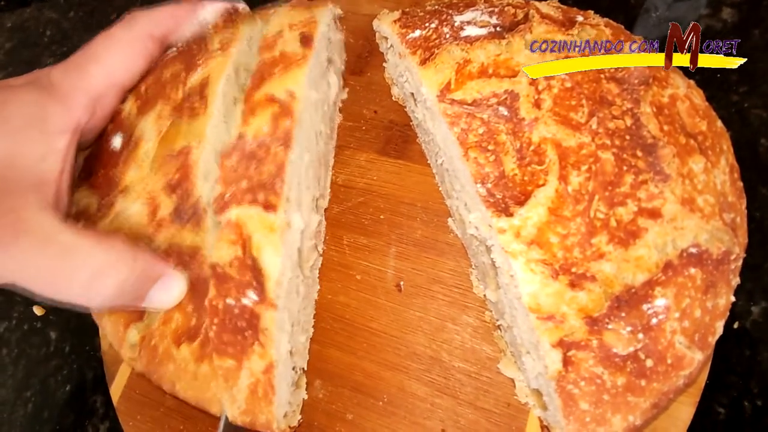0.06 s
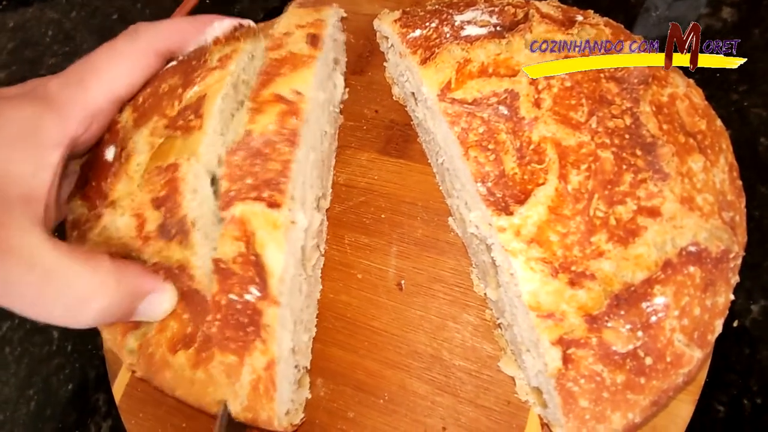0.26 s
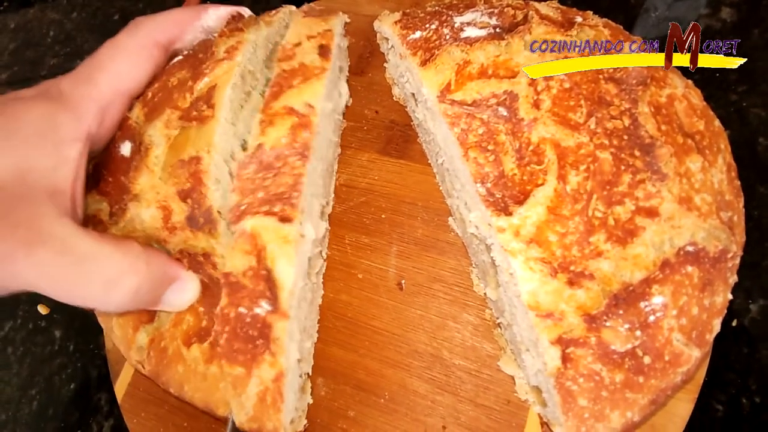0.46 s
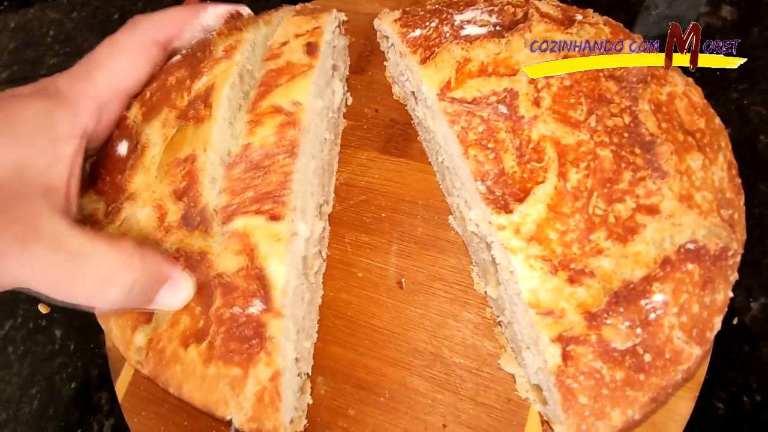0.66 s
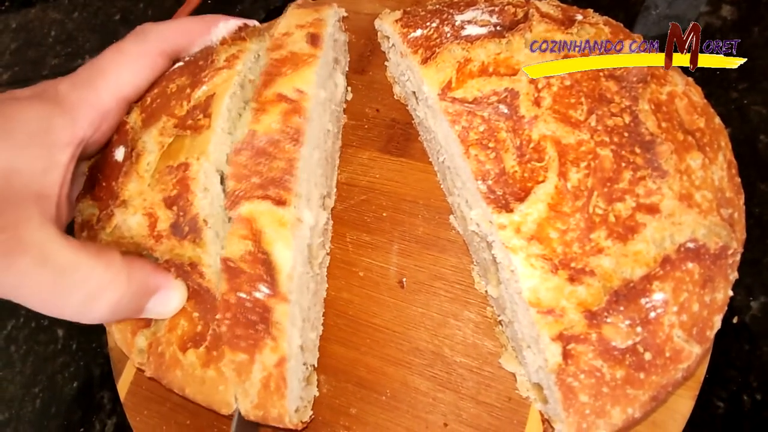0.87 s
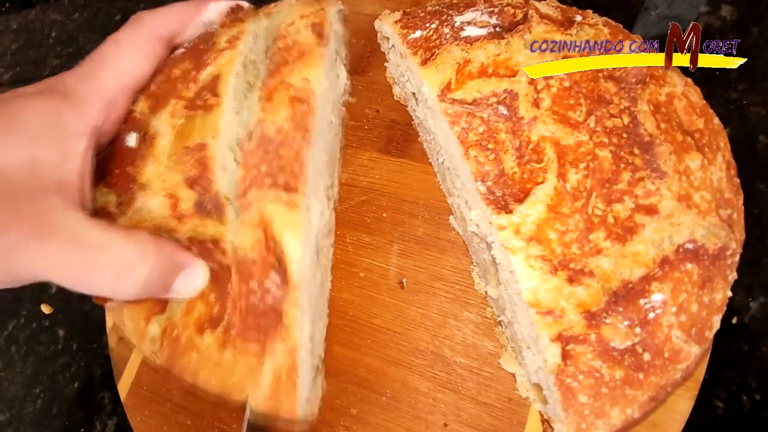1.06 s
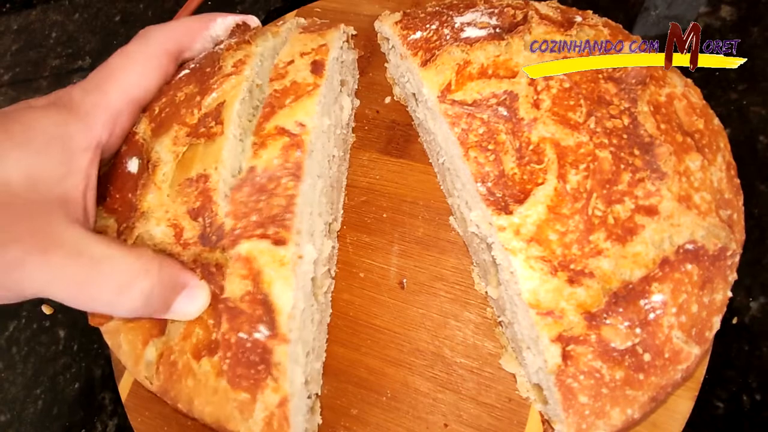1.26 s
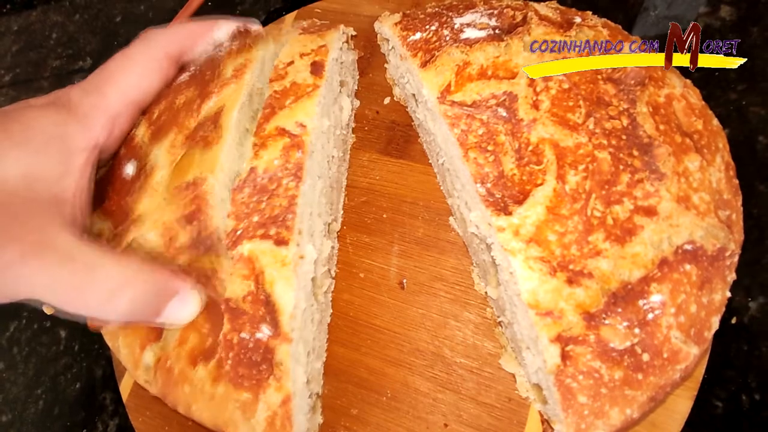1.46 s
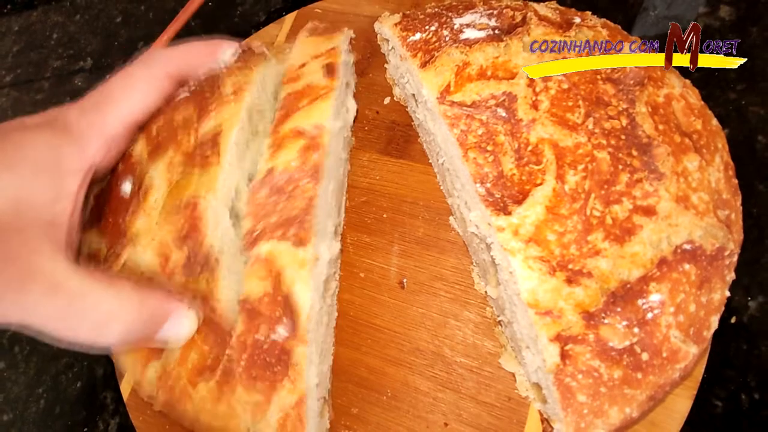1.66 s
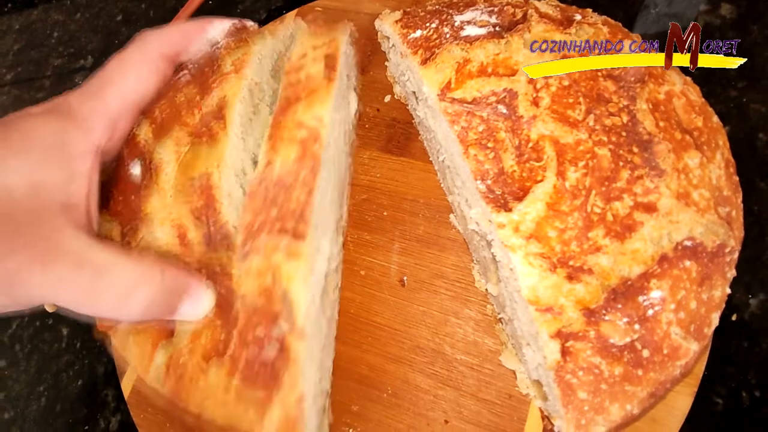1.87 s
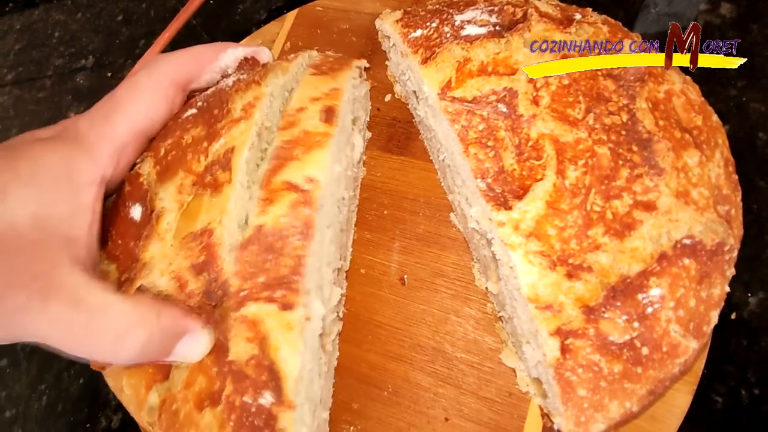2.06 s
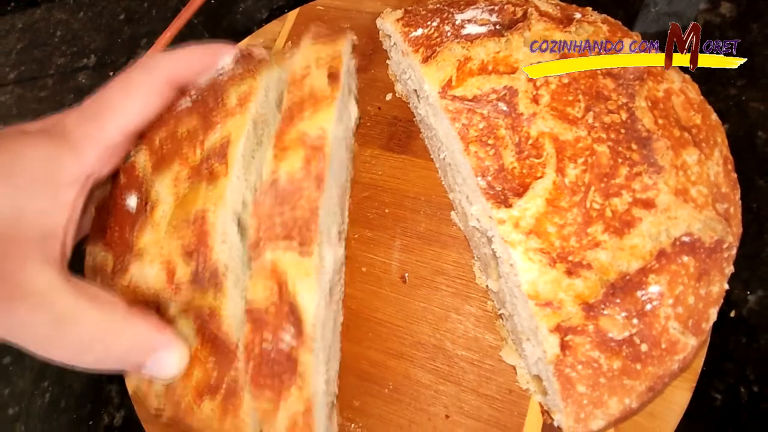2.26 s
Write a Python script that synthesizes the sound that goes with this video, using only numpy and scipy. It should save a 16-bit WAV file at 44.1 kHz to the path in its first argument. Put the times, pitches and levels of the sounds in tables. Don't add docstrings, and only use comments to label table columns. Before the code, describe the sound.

A serrated knife saws back and forth through a crusty loaf in quick uneven strokes, crust snapping brightest early on, the hollow bread and wooden board thudding beneath, heard close in stereo in a small kitchen.

```python
import sys
import numpy as np
from scipy import signal
from scipy.fft import rfft, irfft
from scipy.io import wavfile
from scipy.ndimage import uniform_filter1d

SR = 44100
rng = np.random.default_rng(int(sys.argv[2]) if len(sys.argv) > 2 else 0)


def how_loud(loudness_db):
    steps = np.asarray(loudness_db, float) / 20
    return 10 ** steps


def dump(signal):
    limited = np.clip(np.atleast_2d(signal).T, -1, 1)
    pcm = np.round(limited * 32767).astype(np.int16)
    wavfile.write(sys.argv[1], SR, pcm)


N = 101430


def walk(rate_hz):
    hold = int(SR / rate_hz)
    steps = np.repeat(rng.standard_normal(N // hold + 1), hold)
    return 1.79 * uniform_filter1d(uniform_filter1d(steps, hold), hold)[:N]


def unit(x):
    return x / np.sqrt(np.mean(x ** 2))


def colour(x, points, scale=1):
    point_hz, point_db = np.array(points, float).T
    hz = np.fft.rfftfreq(2048, 1 / SR)
    gain_db = scale * np.interp(np.log(hz + 1), np.log(point_hz), point_db)
    cepstrum = irfft(np.log(how_loud(gain_db) + 1e-5))
    cepstrum[1:1024] *= 2
    cepstrum[1025:] = 0
    return signal.fftconvolve(x, irfft(np.exp(rfft(cepstrum))))[:N]


def ring(x, hz, width_hz):
    return signal.lfilter(*signal.iirpeak(hz, hz / width_hz, fs=SR), x)


def clicks(rate_hz, spread_db):
    chance, sign, size = rng.random(size=(N, 3)).T
    size = np.minimum(-np.log(1 - size), 3.9)
    return unit((chance < rate_hz / SR) * np.sign(sign - .5) * how_loud(spread_db * size))


# (frequency [Hz], level [dB per Hz])
KITCHEN = [(15, -2), (30, 7), (70, 1.5), (150, -0.5), (260, -15.5), (1400, -21), (6000, -20.5),
           (14000, -30)]


def kitchen():
    mid, left, right = (colour(rng.standard_normal(N), KITCHEN) for _ in range(3))
    split = signal.butter(2, 300, fs=SR, output="sos")
    rumble = signal.sosfilt(split, mid) * how_loud(2.0 * walk(10.2))
    floor = [rumble + v - 0.96 * signal.sosfilt(split, v) for v in (left, right)]
    return how_loud(-45.5) * unit(np.array(floor))


def tooth_hail(points):
    apart = 0.82
    hail = [colour(clicks(rate_hz=5000, spread_db=2.5), points) for _ in range(3)]
    mid, left, right = unit(np.array(hail))
    return mid * np.sqrt(1 - apart) + np.array([left, right]) * np.sqrt(apart)


# (time [s], level [dB])
BITE = [
    [(0, -41.5), (.05, -50), (.09, -44.5), (.12, -53), (.172, -74)],
    [(.18, -39), (.23, -46), (.29, -42), (.35, -40), (.39, -58), (.43, -49.5)],
    [(.455, -43), (.5, -42.5), (.545, -32), (.6, -36), (.66, -45), (.7, -44.5), (.74, -64)],
    [(.77, -50), (.82, -42), (.87, -38.5), (.92, -45.5), (.98, -46), (1.03, -46), (1.06, -82)],
    [(1.08, -50), (1.105, -41.5), (1.135, -38.5), (1.17, -32.5), (1.21, -36.5), (1.27, -47.5),
     (1.33, -47.5), (1.36, -52.5), (1.398, -49)],
    [(1.408, -46), (1.43, -41.5), (1.462, -47), (1.49, -58.5), (1.518, -61)],
    [(1.534, -49.5), (1.6, -44), (1.642, -35.5), (1.665, -35), (1.71, -41), (1.758, -40), (1.79, -70),
     (1.845, -92)],
    [(1.856, -52), (1.885, -42), (1.9, -37.5), (1.95, -31.5), (2.0, -36.5), (2.05, -49.5), (2.075, -79),
     (2.108, -71)],
    [(2.118, -45), (2.18, -46), (2.24, -53), (2.3, -47.5)],
]
SCRAPE_DB = [-6, -1, -8.5, -4, -7.5, -2, -3.5, -2.5, -1.5]
# (frequency [Hz], level [dB per Hz])
CRACKLE = [(2500, -33), (4500, -5.5), (6300, -7.5), (7800, -4.5), (9200, 4), (11500, -6.5), (13800, -9),
           (14600, -30)]
# (frequency [Hz], level [dB per Hz])
CRUMB = [(150, -64.5), (300, 3), (1100, -2.5), (1500, -6.5), (2300, 2.5), (3700, 0), (4400, -11),
         (9000, -50)]


def rasp():
    flutter_db = 1.39 * walk(110) + .3 * walk(30)
    t = np.arange(N) / SR
    curves = [np.array(b, float) for b in BITE]
    rows = np.concatenate(curves)
    rows = rows[np.argsort(rows[:, 0])]
    bite_db = np.interp(t, *rows.T)
    crumb_db = np.interp(t, [np.mean(c[:, 0]) for c in curves], SCRAPE_DB)
    crackle = tooth_hail(CRACKLE) * how_loud(bite_db + 1.5 + flutter_db)
    scrape = tooth_hail(CRUMB)
    scrape_db = 0.72 * (bite_db + 40) - 41 + crumb_db + flutter_db + 0.53 * walk(60.16)
    return crackle + scrape * how_loud(scrape_db)


# (start [s], end [s], push [dB])
STROKES = [
    (-.12, 0.184, -51.5),
    (0.142, 0.444, -35.5),
    (0.388, 0.746, -47.5),
    (0.76, 1.085, -42),
    (1.06, 1.34, -49.5),
    (1.362, 1.516, -46.5),
    (1.544, 1.788, -36),
    (1.87, 2.039, -40.5),
    (2.074, 2.494, -52.5),
]


def strokes(levels_db, shape, late_s=0.):
    t = np.arange(N) / SR - late_s
    env = np.zeros(N)
    for (start_s, end_s, _), db in zip(STROKES, levels_db):
        along = np.clip((t - start_s) / (end_s - start_s), 0, 1) ** 0.9
        env += how_loud(db) * np.sin(np.pi * along).clip(0) ** shape
    return env


def judder_modes(modes):
    drive = clicks(rate_hz=1500, spread_db=-0.5)
    out = np.zeros(N)
    for k, (hz, width_hz, db) in enumerate(modes):
        mode = ring(ring(drive, hz, 1.5 * width_hz), hz, 1.5 * width_hz)
        out += (-1) ** k * how_loud(db) * unit(mode)
    return unit(out)


# (frequency [Hz], width [Hz], level [dB])
LOAF = [(239, 53, -5), (321.3, 34, -5), (429, 46, -10.5), (507.6, 44, 1), (584, 44, 1.5), (670.5, 36, -5.5),
        (769, 88, -2), (949, 73, -3.5), (1130, 210, -1.5), (1280, 156, -3), (1590, 420, -10)]


def loaf():
    lead_s, apart = 0.00009, 0.74
    mid, left, right = (judder_modes(LOAF) for _ in range(3))
    both = np.array([np.roll(mid, -int(lead_s * SR)) + apart * left, mid + apart * right])
    push_db = [s[2] for s in STROKES]
    return both * strokes(push_db, shape=2.79)


# (frequency [Hz], width [Hz], level [dB])
BOARD = [(96.7, 11.3, 0.5), (133.6, 12.4, 2), (167.7, 30, -2), (233, 59, -8.5)]
ROCK_DB = [-43, -41, -44, -39, -47, -44, -35, -48, -62]


def board():
    return judder_modes(BOARD) * strokes(ROCK_DB, shape=1.83, late_s=0.019)


# (time [s], peak [dB], low part [dB])
SNAPS_TOP = [(0.024, -36, -12), (0.084, -27, -27), (0.182, -28, -6.5), (0.1875, -22, -27),
             (0.1907, -33, -16), (0.1984, -27, -13), (0.2115, -15.5, -19), (0.2264, -27, -11),
             (0.2396, -17, -26), (0.2516, -20, -10), (0.2637, -13.5, -14), (0.3273, -5, -21.5),
             (0.332, -9.5, -35), (0.3474, -28, -15), (0.406, -28, -33), (0.463, -23, -20),
             (0.4725, -22.5, -20), (0.4767, -20.5, -17), (0.4958, -12, -27), (0.5102, -10.5, -33),
             (0.5278, -9, -34), (0.5341, -8, -20), (0.537, -11.5, -41), (0.541, -15, -28),
             (0.5507, -17, -12.5), (0.5666, -10, -31), (0.5804, -30, -15), (0.5956, -18, -23),
             (0.6095, -16, -15), (0.622, -14.5, -23), (0.6364, -24, -13), (0.6983, -40.5, -27),
             (0.8154, -29, -19), (0.825, -26.5, -30)]
# (time [s], peak [dB], low part [dB])
SNAPS_DEEP = [(1.0034, -27, -6), (1.0084, -29.5, -7.5), (1.045, -31, -21), (1.0765, -32, -22),
              (1.1009, -33, -13), (1.1398, -17.5, -17), (1.1434, -14, -23), (1.1474, -14.5, -17),
              (1.1534, -23, -9), (1.1603, -4.5, -22), (1.1724, -21, -18), (1.1844, -21, -20),
              (1.1924, -25, -11), (1.2131, -22, -17), (1.2264, -22, -38), (1.2506, -14.5, -43),
              (1.27, -25, -19), (1.2844, -28, -13), (1.3084, -19, -22), (1.4044, -30.5, -14),
              (1.4234, -32, -3), (1.4314, -35, -17), (1.5044, -37, -22), (1.5264, -35, -14),
              (1.5344, -29, -26), (1.5589, -35, -16), (1.6945, -25, -21), (1.8277, -39, -22),
              (1.8404, -41.5, -9), (1.8527, -34, -1.5), (1.8614, -38, -25), (1.8926, -21, -36),
              (2.0108, -25, -18), (2.0294, -28, -13), (2.1161, -28, -14), (2.1214, -30, -14),
              (2.2578, -26.5, -24), (2.2614, -43, -18.5)]
# (time [s], peak [dB], low part [dB])
SPLINTERS = [(.0276, -31, -18), (.2667, -13, -22), (.3301, -6, -22), (.5205, -20, -24), (.6904, -28, -22),
             (.7012, -21, -22), (.7097, -30, -22), (.8277, -23, -22), (1.2522, -14, -14),
             (1.2725, -18, -24), (1.4088, -20, -18), (1.8553, -29, -12)]
# (frequency [Hz], level [dB])
SNAP = [(2500, -35), (4500, -14), (6300, -11), (7800, -4.5), (9200, 2), (11500, -12), (13800, -13.5),
        (14600, -35)]
# (frequency [Hz], level [dB])
SNAP_AIR = [(14400, -33), (15000, -7), (16300, -2), (17000, -40)]


def snaps():
    rise_s, burst_s, tail_s, tail_db = .0006, 0.0009, 0.006, -13
    rise = int(rise_s * SR)
    t = np.arange(2000) / SR
    decay = np.exp(-t / burst_s) + how_loud(tail_db) * np.exp(-t / tail_s)
    env = np.r_[np.linspace(0, 1, rise) ** 2, decay][:len(t)]
    bright = list(SNAP)[:-1] + list(SNAP_AIR)
    out = np.zeros((2, N + SR))
    for time_s, db, low_db in list(SNAPS_TOP) + list(SNAPS_DEEP) + list(SPLINTERS):
        grit = rng.standard_normal(size=(3, len(t))) * env
        grit[0, rise] += 1.8
        burst = grit[0] + 1.13 * grit[1:]
        high = np.array([colour(v, bright)[:len(t)] for v in burst])
        low = how_loud(low_db + 4.5) * ring(burst, hz=3300, width_hz=2200)
        i = int((time_s - rise_s / 2) * SR)
        peak = np.mean(np.abs(high).max(axis=1))
        out[:, i:i + len(t)] += (high + low) * how_loud(db + 2) / peak
    return out[:, :N]


# (frequency [Hz], level [dB])
PORTS = [(200, -10.5), (400, -2.5), (2000, 1), (4300, 3), (8000, -5.5), (9500, -14), (11500, 17),
         (14500, -4)]


def port(x, side, lag_s):
    near_s, near_db, room_t60_s, room_db = 0.0018, -2.5, 0.26, -10
    t = np.arange(int(.4 * SR)) / SR
    near = rng.standard_normal(len(t)) * np.exp(-t / near_s) * (t > .0004)
    room = rng.standard_normal(len(t)) * how_loud(-60 * t / room_t60_s) * (t > .004)
    path = how_loud(near_db) * near / np.linalg.norm(near) + how_loud(room_db) * room / np.linalg.norm(room)
    path = signal.sosfilt(signal.butter(2, 700, "high", fs=SR, output="sos"), path)
    path[0] += 1
    heard = signal.fftconvolve(x, path)[:N]
    late = np.r_[np.zeros(int(lag_s * SR)), heard][:N]
    return colour(late, PORTS, scale=side / 2)


def scene():
    rocking = board()
    left, right = rasp() + snaps() + loaf()
    ports = np.array([port(left, side=1, lag_s=.0003), port(right, side=-0.27, lag_s=0)])
    return ports + rocking + kitchen()


def top_cut(x):
    return signal.sosfilt(signal.butter(12, 15360, fs=SR, output="sos"), x)


def record(dry):
    low_pass = signal.ellip(6, .5, 32, 14450, fs=SR, output="sos")
    mix = signal.sosfilt(low_pass, dry)
    return top_cut(mix)


dry = scene()
out = record(dry)
dump(out)
```